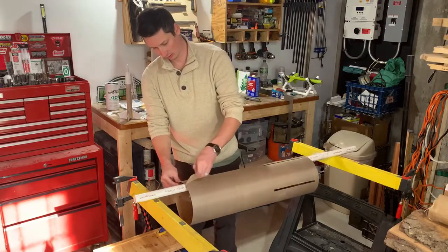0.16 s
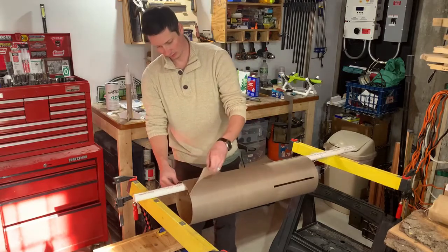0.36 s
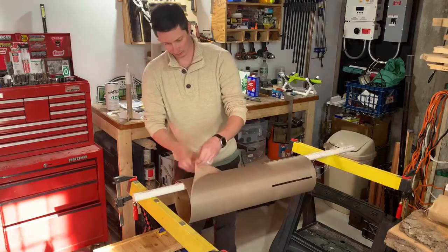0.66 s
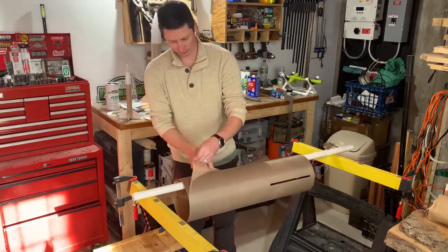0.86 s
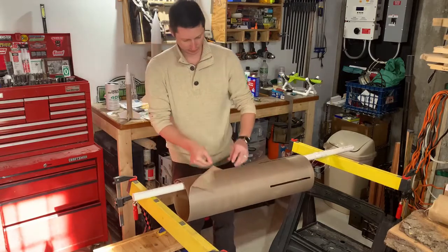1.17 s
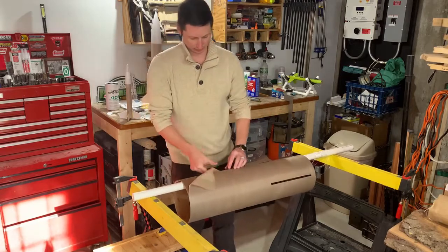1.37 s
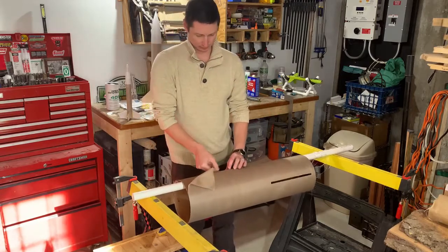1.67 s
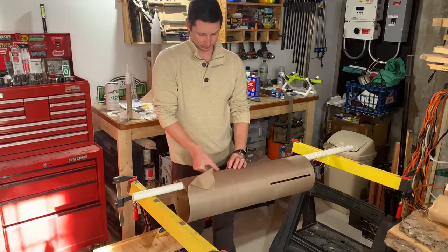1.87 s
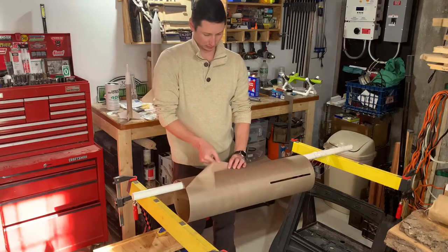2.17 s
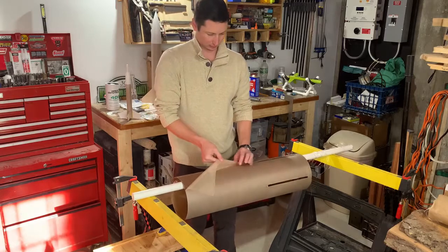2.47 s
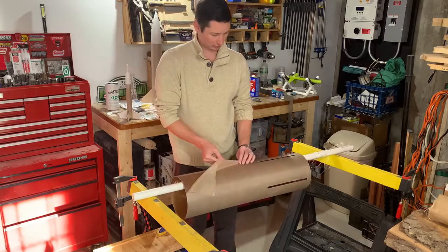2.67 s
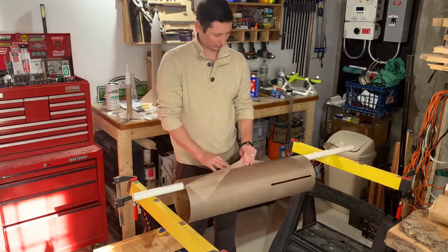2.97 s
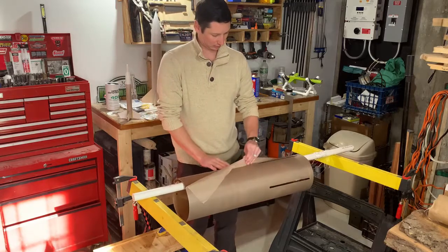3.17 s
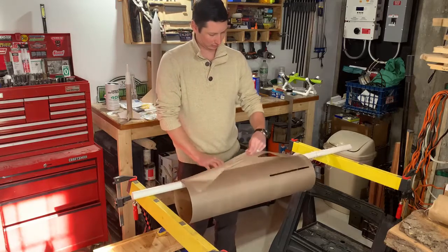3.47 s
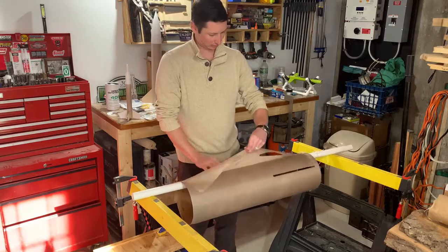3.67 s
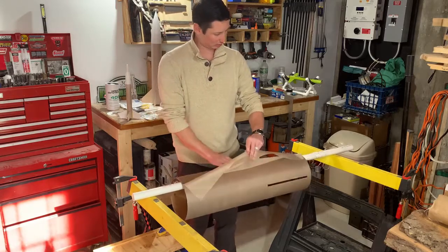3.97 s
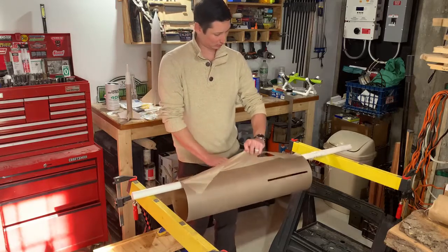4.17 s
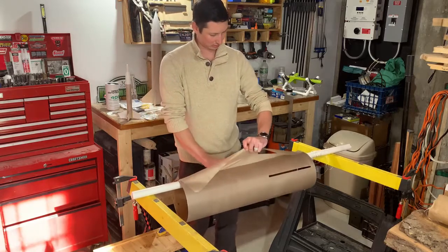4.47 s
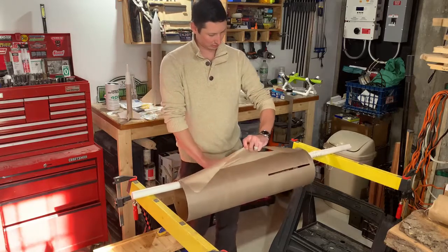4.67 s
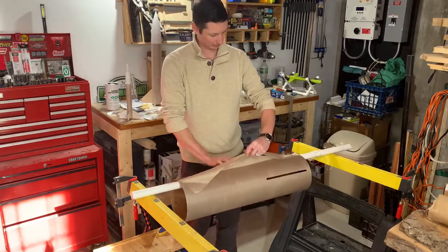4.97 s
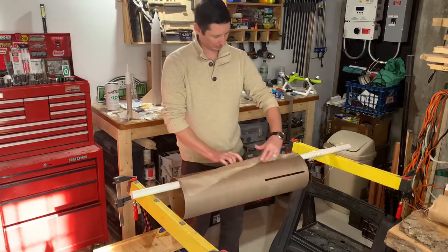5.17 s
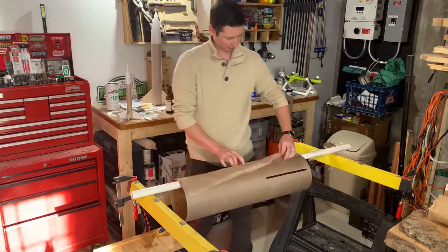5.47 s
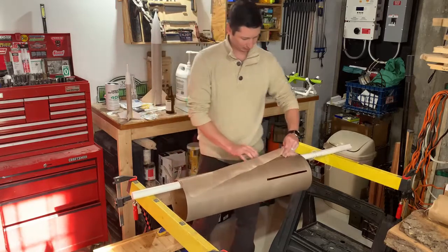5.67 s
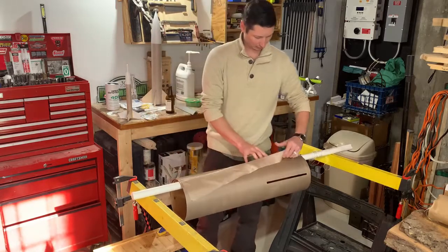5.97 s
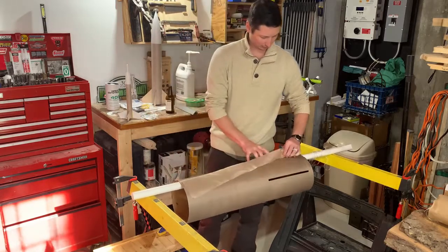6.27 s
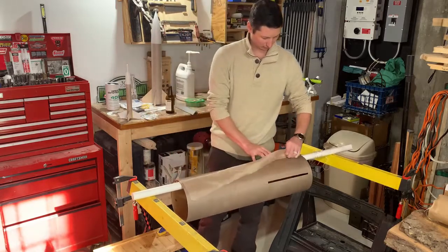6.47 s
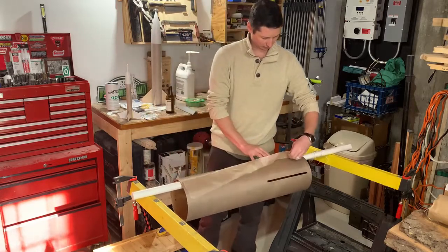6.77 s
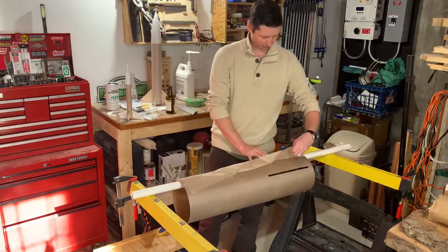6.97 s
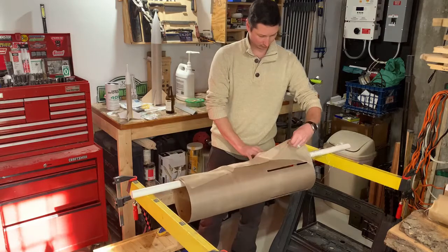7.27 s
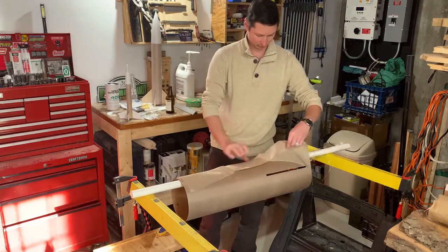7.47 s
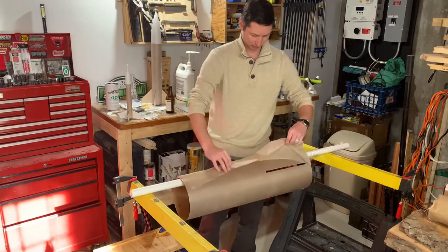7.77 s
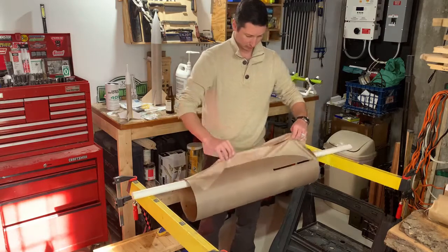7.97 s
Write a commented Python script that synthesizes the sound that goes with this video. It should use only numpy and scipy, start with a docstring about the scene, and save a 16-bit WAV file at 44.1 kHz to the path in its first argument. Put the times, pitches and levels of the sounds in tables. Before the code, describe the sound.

Uneven dry tearing, bright with breaking threads, makes a hard tube rattle and boom hollowly. Short pulls alternate with near-quiet rustling; the strongest cracks cluster just after three seconds, knocks follow past four, and rapid popping leads into sustained ripping after six. The tear drifts from left to about centre, in a small, briefly echoing room with soft hiss and a low wavering hum.

```python
"""Release fabric is torn in uneven pulls off a hard hollow glass-fibre tube in a small workshop.
Tearing: random thread breaks feed a bright thread colour, a rattling wall and the booming air column.
Stuck patches snap and fingers knock the shell: noise bursts and short pushes into the same tube.
Short workshop echoes surround it, over a steady hiss and a low wavering hum.
A small stereo microphone with two ports listens; its treble comes mostly from the left port."""
import sys
import numpy as np
from scipy import signal
from scipy.fft import rfft, irfft, next_fast_len
from scipy.io import wavfile

SR = 44100
rng = np.random.default_rng(int(sys.argv[2]) if len(sys.argv) > 2 else 0)


def generate_wav(sig):
    """Save sig (samples, or channels by samples) to the path in sys.argv[1] as 16-bit PCM at SR."""
    pcm = np.round(np.clip(np.atleast_2d(sig).T, -1, 1) * 32767).astype(np.int16)
    wavfile.write(sys.argv[1], SR, pcm)


N = 358091

# All event and spectrum levels are relative; each source adds its own gain.

# Place: steady room hiss, (frequency [Hz], relative level per Hz [dB])
HISS_SPECTRUM = [(15, -44.5), (25, -25), (97, -8), (108, 1.5), (127, -2), (185, -14), (4740, -49),
                 (6050, -40), (8360, -37.5), (11000, -43), (16000, -37.5)]
# Wavering motor tones, (frequency [Hz], width [Hz], level before the swell [dB])
HUM_TONES = [(50.9, 14, -71.5), (77.1, 7.1, -69), (125.5, 8, -74)]
# Swell of those tones as the tube rocks on its rod, (time [s], level [dB])
HUM_SWELL = [(0.0, -57.5), (1.92, -73.5), (3.28, -62.5), (8.12, -65.5)]
# Workshop echoes, (frequency [Hz], echo level [dB], decay time to -60 dB [s])
ECHOES = [(100, -35, 0.17), (263, -35.5, 0.81), (570, 3, 0.11), (1580, -2, 0.089), (5000, 2, 0.2),
          (12300, -2.5, 0.049)]
HISS_DB = -72   # part shared by both ports

# Microphone: balance of its two ports, (frequency [Hz], left minus right [dB])
PORT_BALANCE = [(100, -1.5), (400, -0.5), (1000, 0.5), (2500, -0.1), (5000, -4), (7000, -2.5)]
PORTS_JOIN_HZ, LEFT_PORT_SHARE = 7000, 0.72   # above this, the left port's share of the right side
LEFT_LAG_S, LEFT_TURN_RAD = .000204, -7.9   # left against right in the treble
CUTOFF_HZ = 15750

# Colour of breaking threads, (frequency [Hz], relative level per Hz [dB])
THREAD_SPECTRUM = [(4200, -12), (5500, -7.5), (7000, -4.5), (8500, 0.5), (11000, -0.5), (13500, -3),
                   (16000, -3.5)]
# Colour of the tube wall, (frequency [Hz], relative level per Hz [dB])
WALL_SPECTRUM = [(150, -7), (340, 4), (450, 4), (600, 5), (900, -1), (1400, 1), (2500, -2), (4300, -9.5),
                 (5500, -19.5), (7500, -38.5)]
# Wall resonances, (frequency [Hz], width [Hz], lift [dB])
WALL_MODES = [(553, 25, 4), (1412, 43, 2), (2020, 37, 0.5), (4650, 700, 4.5)]
# Two close modes of the air in the tube, (frequency [Hz], width [Hz], level [dB])
AIR_MODES = [(262, 24, 1.5), (291, 24, 1.5)]
AIR_WANDER_S = .0006   # swing of its lag: hands and loose fabric keep detuning the air column
AIR_SWELL_HZ = 70   # width of the shell's low mode, through which a blow reaches the air column late

# Bright ring after one hard snap, (frequency [Hz], level [dB], decay time to -60 dB [s])
RING_MODES = [(1310, -6, 0.15), (2240, -8, 0.11), (4160, 1, 0.075), (4740, 2, 0.098), (5420, -9, 0.15),
              (6379, -12, .14)]
RING_S, RING_DB = 3.592, -45   # onset, and level added to every mode
RING_SPLIT = .018   # each mode is a close, beating pair: relative spacing

# Fingers on the shell and jolts on the rod, (time [s], dull knock level [dB], air column level [dB])
KNOCKS = [(0.9598, -56, -58), (1.266, -48, -58), (1.654, -63, -70), (3.0315, -41, -46), (3.0445, -37, -41),
          (3.1921, -37.5, -55), (3.3363, -34, -43), (3.3556, -35, -40), (3.4195, -33.5, -41),
          (3.658, -60, -50), (3.9905, -50, -58), (4.0946, -47.5, -49.5), (4.1955, -48, -54),
          (4.2423, -52, -55), (4.2663, -46.5, -50), (4.3112, -37, -37), (4.329, -28, -42),
          (4.3665, -36, -47), (4.387, -40.5, -46), (4.4075, -33, -55), (4.4391, -45, -42),
          (4.8772, -27, -28), (4.9365, -38, -48), (4.9470, -39, -34), (4.9771, -38, -29),
          (5.0901, -47, -70), (5.3431, -49.5, -33), (5.7540, -64, -40), (5.955, -61.5, -45.5),
          (6.113, -54.5, -50), (6.8608, -48.5, -41), (7.1985, -50, -40), (7.8065, -53, -58),
          (7.9072, -49, -49)]
# Shell modes under a knock, (frequency [Hz], width [Hz], level [dB])
KNOCK_MODES = [(400, 130, 1), (530, 110, 3), (615, 45, 4), (800, 326, -6), (1010, 350, -6.5),
               (2080, 760, -20)]
KNOCK_WALL_DB, KNOCK_THREAD_DB = -8, -37   # a knock also ticks in wall and fabric, relative to its level
KNOCK_VARY_DB = 2.5   # each blow lands elsewhere and stirs the modes differently
KNOCK_CONTACT = 2.0   # gain of the first contact, against the rough scuff with it

# Stuck patches letting go, (time [s], wall level [dB], thread level [dB])
SNAPS = [(0.0926, -51, -37), (.5142, -45, -53), (0.657, -63, -56), (.684, -60, -58), (.701, -58, -63),
         (.7735, -42, -55), (.7795, -40, -50), (1.655, -53, -66), (2.082, -69, -44), (2.342, -48, -75),
         (2.48, -48.5, -71), (2.7247, -40, -68), (2.9903, -26, -46), (3.031, -21, -38.5),
         (3.1582, -22.5, -39.5), (3.1914, -18.5, -40), (3.2927, -16, -27.5), (3.5758, -35, -58),
         (3.5896, -19.5, -34), (3.9642, -42, -48), (3.9845, -37.5, -50.5), (4.2661, -33.5, -43.5),
         (4.364, -26, -42.5), (4.3863, -28, -44), (4.406, -29, -42), (4.44, -40, -46), (4.6175, -50, -75),
         (4.934, -49, -57), (5.0905, -34, -48), (5.583, -38.5, -51), (5.8633, -47.5, -54.5),
         (6.111, -42, -91), (6.297, -46, -74), (6.35, -44, -68), (6.373, -33.5, -52), (6.417, -32, -48),
         (6.4418, -31, -51), (6.468, -30, -48), (6.505, -31, -41.5), (6.5287, -32, -38.5),
         (6.5455, -32, -45), (6.552, -28.5, -42), (6.5755, -25, -37), (6.5948, -28.5, -38.5),
         (6.6105, -28, -38), (6.627, -29.5, -41), (6.6465, -33, -42), (6.6555, -30, -38), (6.672, -36, -39),
         (6.79, -30, -52), (6.8612, -27, -43), (7.1977, -48, -44.5), (7.38, -45, -53.5),
         (7.4911, -41, -49.5), (7.882, -44, -70), (7.908, -39, -47)]
SNAP_T60_S, SNAP_RISE_S = 0.03, 0.00097   # decay in the wall, and rise time constant
SNAP_KNOCK_DB, SNAP_AIR_DB = -27.5, -24.5   # a snap also jolts shell and air column, relative to its wall level

# Hands and loose fabric between tugs, (time [s], thread level [dB], wall level [dB], air column level [dB])
RUSTLE = [(0.0, -93, -61, -73), (.87, -77, -74.5, -90), (1.078, -76.5, -75, -71), (1.197, -100, -85, -100),
          (1.4, -91, -84.5, -97), (1.93, -84.5, -87, -85), (2.065, -92, -85, -89), (2.33, -88, -70, -61.5),
          (2.5, -91, -74.5, -71), (2.7, -97, -77, -89), (3.8, -94, -80.5, -85), (3.95, -91, -72, -80),
          (4.2, -84, -70, -60.5), (4.58, -95.5, -78, -100), (4.85, -94, -86, -80), (5.02, -81, -64, -56.5),
          (5.23, -84, -76, -81), (5.33, -85, -77, -70), (5.55, -81, -68, -75), (5.85, -81, -75, -63.5),
          (6.3, -88, -74, -63.5), (7.45, -87, -73, -91), (7.59, -80, -76.5, -80), (7.8, -77, -65, -65),
          (8.12, -89, -72.5, -72)]
RUSTLE_LUMPS_DB = 3.6   # spread: it comes and goes

# Separate tugs on the fabric, (start [s], swell [s], sag [s],
# peak of thread crackle [dB], of wall rattle [dB], of air column [dB])
TUGS = [(0.0, 0.00063, 0.073, -44.5, -48.5, -66), (0.089, .006, 0.092, -45.5, -45.5, -55),
        (.195, 0.11, 0.1, -47.5, -43.5, -52), (0.513, .012, 0.19, -61.5, -52.5, -57.5),
        (0.775, 0.0034, 0.011, -79.5, -46, -59), (.953, 0.013, 0.028, -78, -61.5, -60),
        (1.05, .006, 0.017, -72, -63, -67), (1.104, .006, 0.014, -80, -64, -67),
        (1.262, 0.0071, 0.032, -75, -63.5, -64), (1.97, 0.034, 0.02, -77, -69, -71),
        (2.088, 0.031, .03, -48, -51.5, -60), (2.129, 0.058, 0.068, -42.5, -42.5, -49),
        (2.5, 0.061, 0.079, -68, -66.5, -68.5), (2.727, 0.075, 0.083, -48.5, -44, -52.5),
        (2.866, 0.0081, 0.018, -44, -40, -44), (2.9, 0.008, 0.0085, -36.5, -33.5, -52),
        (2.989, 0.0065, 0.019, -50, -45.5, -57), (3.032, 0.013, 0.01, -39.5, -34.5, -38),
        (3.159, 0.004, 0.048, -51, -39.5, -41.5), (3.293, 0.016, 0.098, -35.5, -30.5, -42),
        (3.324, 0.037, 0.035, -30.5, -29, -51), (3.416, 0.027, .04, -37, -33, -33),
        (3.46, .045, .012, -41, -36, -32), (3.579, .012, 0.016, -43, -37, -58),
        (3.619, 0.0016, 0.046, -63.5, -48.5, -60), (3.965, 0.031, 0.019, -62, -54, -71),
        (4.089, 0.0054, 0.011, -63.5, -55, -54), (4.256, 0.019, 0.067, -65, -55, -59),
        (4.3, 0.053, .02, -69, -59, -42), (4.36, 0.049, 0.041, -53.5, -47, -49),
        (4.873, 0.014, 0.028, -77.5, -50, -42), (4.93, 0.011, 0.027, -78, -53, -42),
        (5.04, 0.04, 0.051, -61.5, -54, -53), (5.26, 0.034, 0.017, -75, -66, -70),
        (5.342, 0.009, 0.02, -71, -53, -58), (5.359, 0.016, 0.058, -69, -46, -54),
        (5.41, 0.014, 0.05, -60.5, -54, -52), (5.579, 0.12, 0.029, -57.5, -53, -61),
        (5.76, 0.017, 0.033, -86, -58.5, -47.5), (6.09, 0.017, 0.031, -77, -63, -65),
        (6.371, 0.11, 0.0075, -48, -44.5, -39.5), (6.53, 0.053, 0.056, -52.5, -47, -39.5),
        (6.64, 0.039, 0.1, -45.5, -42.5, -44.5), (6.73, 0.072, 0.03, -47.5, -41.5, -46),
        (6.861, 0.05, 0.14, -47, -42.5, -38), (6.99, 0.16, 0.013, -44.5, -44.5, -42.5),
        (7.198, 0.013, 0.019, -45, -42.5, -46), (7.343, 0.0034, 0.012, -76, -59.5, -43.5),
        (7.48, 0.016, 0.027, -70, -60, -75), (7.801, 0.082, .01, -72, -59, -66),
        (7.908, .006, .03, -56, -52, -50), (7.948, 0.036, 0.016, -43, -39.5, -50),
        (7.985, 0.03, 0.02, -41, -37, -46)]
# Fall after a tug, one value each [dB/s]: threads, wall, air column
RELEASE_DB_PER_S = [520.5, 349.5, 299.5]
BITE_DB_PER_S, SWELL_DB, SAG_DB = 1197, 7.5, 7   # sets in fast, swells to its peak, sags until the tear sticks
POP_SHARE = .55   # gain of lone threads popping out of the crackle


def from_db(db):
    """Decibels to gain."""
    return 10 ** (np.asarray(db) / 20)


def rms_one(x):
    """Scale to unit power."""
    return x / np.sqrt(np.mean(x ** 2) + 1e-20)


def in_time(rows):
    """Columns of a curve, one value a sample."""
    s, *columns = np.transpose(rows)
    return [np.interp(np.arange(N) / SR, s, c) for c in columns]


def at_hz(points, hz, column=1):
    """Read a spectrum on a log-frequency axis."""
    points = np.array(points)
    return np.interp(np.log(hz + 1), np.log(points[:, 0]), points[:, column])


def drift(rate):
    """Slow random wander of unit power: noise through two equal low-pass poles at the rate [Hz]."""
    r = np.exp(-2 * np.pi * rate / SR)
    settle = 9000
    wander = signal.lfilter([1], [1, -2 * r, r * r], rng.standard_normal(N + settle))
    return rms_one(wander[settle:])


def resonance(x, hz, width):
    """Two-pole band with gain 1 on top."""
    r = np.exp(-np.pi * width / SR)
    zeros = np.array([1, 0, -1]) * (1 - r * r) / 2
    poles = [1, -2 * r * np.cos(2 * np.pi * hz / SR), r * r]
    return signal.lfilter(zeros, poles, x)


def modes(x, table):
    """Resonances side by side with alternating signs, so close pairs swell, beat and fall off steeply."""
    pushes = np.broadcast_to(x, (len(table), N))
    return sum((-1) ** k * from_db(db) * resonance(push, hz, width)
               for k, (push, (hz, width, db)) in enumerate(zip(pushes, table)))


def colour(x, points, skirt_db):
    """Minimum-phase filter of unit power with a given spectrum; its skirt falls per octave below the first point."""
    hz = np.fft.rfftfreq(4096, 1 / SR)
    octaves_below = np.maximum(np.log2(points[0][0] / (hz + 5)), 0)
    level_db = at_hz(points, hz) - skirt_db * octaves_below
    # Folding the cepstrum forward in time makes the filter causal.
    cepstrum = irfft(np.log(from_db(level_db)))
    cepstrum[1:2048] *= 2
    cepstrum[2049:] = 0
    pulse = irfft(np.exp(rfft(cepstrum)))
    return signal.oaconvolve(x, pulse / np.sqrt(np.sum(pulse ** 2)))[:N]


def room_tone():
    """Steady hiss, partly its own at each port, with low motor tones (narrow noise bands) that swell."""
    common, left, right = (colour(n, HISS_SPECTRUM, skirt_db=0) for n in rng.standard_normal((3, N)))
    hiss = from_db(HISS_DB) * (common + 0.9 * np.array([left, right]))
    tones = np.zeros(N)
    for hz, width, db in HUM_TONES:
        narrow = resonance(rng.standard_normal(N), hz, width)
        tones += from_db(db) * rms_one(resonance(narrow, hz, width))
    swell_db = in_time(HUM_SWELL)[0] + 66.5   # tones keep their table level where the curve is at -66.5 dB
    return hiss + tones * from_db(swell_db)


def echo_places(count):
    """Two-port impulse responses: direct sound plus noise that dies band by band, one for each place."""
    t = np.arange(SR // 3) / SR
    edges = 80 * 2 ** np.arange(0, 8.5)
    echo = np.zeros((count, 2, len(t)))
    for low, high in zip(edges, np.minimum(edges[1:], 20000)):
        band_filter = signal.butter(2, [low, high], "band", fs=SR, output="sos")
        band = signal.sosfilt(band_filter, rng.standard_normal(echo.shape))
        hz = np.sqrt(low * high)
        fade = from_db(-60 * t / at_hz(ECHOES, hz, column=2)) * (t > .0015)
        echo += from_db(at_hz(ECHOES, hz)) * band * fade / np.sqrt(np.sum(fade ** 2))
    # Lag in samples: the tear moves from the left to just past centre.
    right_lag = np.linspace(5, -1, count).round().astype(int)
    echo[:, 0, 1] += 1
    echo[np.arange(count), 1, 1 + right_lag] += 1
    return echo


def workshop(x, count=48):
    """The tear travels through the room, so each cross-fading stretch has echoes of its own."""
    places = echo_places(count)
    length = places.shape[-1]
    step = N // (count - 1) + 1
    padded = np.pad(x, (step, 2 * step))
    out = np.zeros((2, N + 3 * step + length))
    for k, place in enumerate(places):
        stretch = padded[k * step:(k + 2) * step] * np.hanning(2 * step)
        out[:, k * step:(k + 2) * step + length - 1] += signal.fftconvolve(stretch[None], place, axes=1)
    return out[:, step:step + N]


def ring():
    """One sharp blow into lightly damped, paired modes."""
    blow = np.full(N, 1e-18)   # a tiny floor rather than exact silence
    blow[round(RING_S * SR)] = 1
    out = np.zeros(N)
    for hz, db, t60 in RING_MODES:
        damping = np.log(1000) / t60
        gain = from_db(RING_DB + db) / 2 * SR / damping   # undoes the narrow band's small impulse response
        for side in (-.5, .5):
            out += gain * resonance(blow, hz * (1 + RING_SPLIT * side), damping / np.pi)
    return out


def hit_list():
    """Snaps and knocks alike as (time [s], wall, thread, knock and air column level [dB])."""
    hits = [(s, wall, thread, wall + SNAP_KNOCK_DB, wall + SNAP_AIR_DB) for s, wall, thread in SNAPS]
    hits += [(s, knock + KNOCK_WALL_DB, knock + KNOCK_THREAD_DB, knock, air) for s, knock, air in KNOCKS]
    return hits


def snaps_and_knocks():
    """Each snap or knock is a quick burst of breaking threads and one push of the shell."""
    hits, length = hit_list(), 9000
    t = np.arange(length) / SR
    noise, hardness = rng.standard_normal((2, len(hits), length))
    bursts = noise * from_db(5.1 * hardness - 2.5)   # a few threads break far harder
    # Every burst starts at full strength.
    bursts = bursts / np.sqrt(np.mean(bursts[:, :150] ** 2, axis=1, keepdims=True))
    fade = from_db(-60 * t / SNAP_T60_S)
    rise = 1 - np.exp(-t / SNAP_RISE_S)
    push = np.sin(np.pi * np.minimum(t / 0.0015, 1))   # the shell springs back once
    contact = np.sin(np.pi * np.minimum(t / 0.0004, 1))
    stir = from_db(KNOCK_VARY_DB * rng.standard_normal((len(hits), len(KNOCK_MODES), 1)))

    wall, threads, air = np.zeros((3, N + length))
    knocks = np.zeros((len(KNOCK_MODES), N + length))
    for (s, wall_db, thread_db, knock_db, air_db), burst, share in zip(hits, bursts, stir):
        start = round(s * SR)
        after = slice(start, start + length)
        wall[after] += from_db(wall_db - 7.5) * burst * rise * fade
        threads[after] += from_db(thread_db + 14.0) * burst * rise * fade ** 2.92
        scuff = burst * fade ** 1.6
        knocks[:, after] += from_db(knock_db + 13.0) * share * (scuff + KNOCK_CONTACT * contact)
        air[after] += from_db(air_db + 23.0) * push
    return wall[:N], threads[:N], air[:N], knocks[:, :N]


def pulls():
    """Levels [dB] of threads, wall and air column: the strongest tug of the moment, or the rustle."""
    t = np.arange(0, N / SR + .002, .001)
    start, swell, sag, *peaks = np.transpose(TUGS)[..., None]
    swell, sag = np.maximum(swell, .001), np.maximum(sag, .001)
    shape = -BITE_DB_PER_S * np.maximum(start - t, 0)
    shape = shape - SWELL_DB * np.clip(1 - (t - start) / swell, 0, 1)
    shape = shape - SAG_DB * np.clip((t - start - swell) / sag, 0, 1)
    after = np.maximum(t - start - swell - sag, 0)
    tugs = [np.max(peak + shape - fall * after, axis=0) for peak, fall in zip(peaks, RELEASE_DB_PER_S)]
    rustle = in_time(RUSTLE) + RUSTLE_LUMPS_DB * drift(23.0)
    return [np.maximum(np.interp(np.arange(N) / SR, t, tug), low) for tug, low in zip(tugs, rustle)]


def crackle(per_s, spread_db, clump_db):
    """Threads break at random, a few much harder; the tear runs and sticks, so they come in clumps."""
    sizes = from_db(spread_db * np.minimum(rng.exponential(1, N), 5)) * rng.standard_normal(N)
    broken = rng.random(N) < per_s / SR
    clumps = from_db(clump_db * (drift(120) + 0.55 * drift(19)))
    return rms_one(sizes * broken * clumps)


def tube():
    """Tearing, snaps and knocks drive thread colour, wall and shell modes, air column and ring."""
    thread_db, wall_db, air_db = pulls()
    tear = crackle(12000, spread_db=2.8, clump_db=1.1)
    tear = tear + POP_SHARE * crackle(300, spread_db=2.2, clump_db=3)
    wall_snap, thread_snap, air_push, knock = snaps_and_knocks()

    threads = colour(from_db(thread_db - 0.8) * tear + thread_snap, THREAD_SPECTRUM, skirt_db=23.0)

    rattle = colour(from_db(wall_db - 3.0) * tear, WALL_SPECTRUM, skirt_db=16.5)
    crack = colour(wall_snap, WALL_SPECTRUM, skirt_db=8)
    crack = signal.sosfilt(signal.butter(2, 1100, "high", fs=SR, output="sos"), crack)   # a snap is thinner
    wall = rattle + crack
    wall = wall + sum((from_db(db) - 1) * resonance(wall, hz, width) for hz, width, db in WALL_MODES)

    late_push = resonance(air_push, 276, AIR_SWELL_HZ)
    air = modes(from_db(air_db + 26) * tear + late_push, AIR_MODES)
    air = np.interp(np.arange(N) + AIR_WANDER_S * SR * drift(8), np.arange(N), air)

    # The whole tube jolts on its rod.
    thud = from_db(-18.5) * (resonance(air_push, 80, 18) + resonance(air_push, 170, 45))
    return threads + wall + modes(knock, KNOCK_MODES) + air + thud + ring()


def scene():
    """The tube in the workshop over the room tone."""
    return from_db(2.0) * workshop(tube()) + room_tone()


def record(dry):
    """Lows keep both ports; the treble is mostly the left port, lagged and turned; both ends are cut."""
    size = next_fast_len(N + 2048)
    hz, both = np.fft.rfftfreq(size, 1 / SR), rfft(dry, size)
    joined = 1 / (1 + (PORTS_JOIN_HZ / (hz + 1)) ** 24)   # 0 in the lows, 1 in the treble
    side = np.array([[1], [-1]])   # left, right
    # Each side takes half of the lag and turn, in opposite directions.
    shift = np.exp(-.5j * side * joined * (2 * np.pi * hz * LEFT_LAG_S + LEFT_TURN_RAD))
    ports = both + LEFT_PORT_SHARE * joined * (both[0] - both)
    mixed = ports * from_db(side * at_hz(PORT_BALANCE, hz) / 2) * shift
    rumble_filter = signal.butter(3, 38, "high", fs=SR, output="sos")
    rumble_cut = signal.sosfilt(rumble_filter, irfft(mixed, size)[:, :N])
    return signal.sosfilt(signal.ellip(10, .5, 60, CUTOFF_HZ, fs=SR, output="sos"), rumble_cut)


dry = scene()
out = record(dry)
generate_wav(out)
```